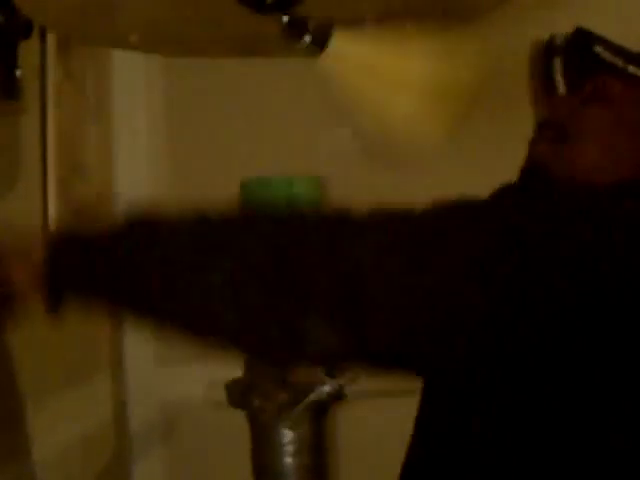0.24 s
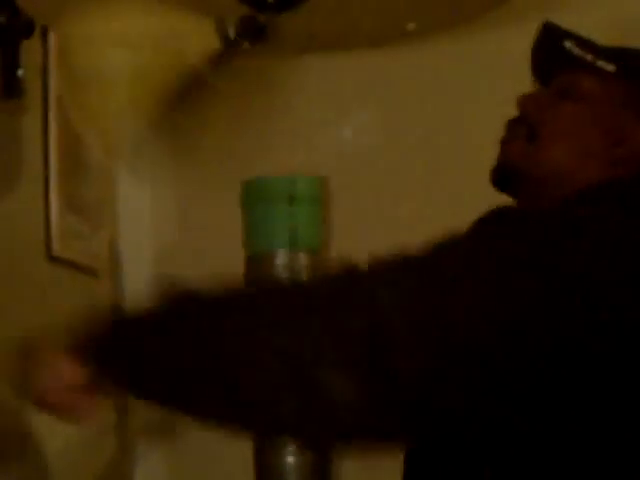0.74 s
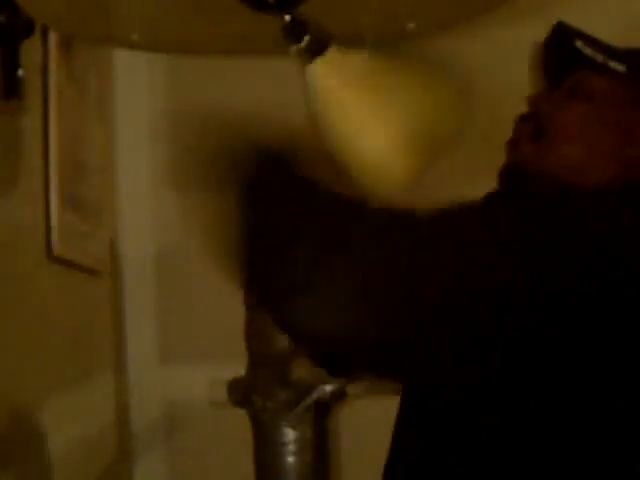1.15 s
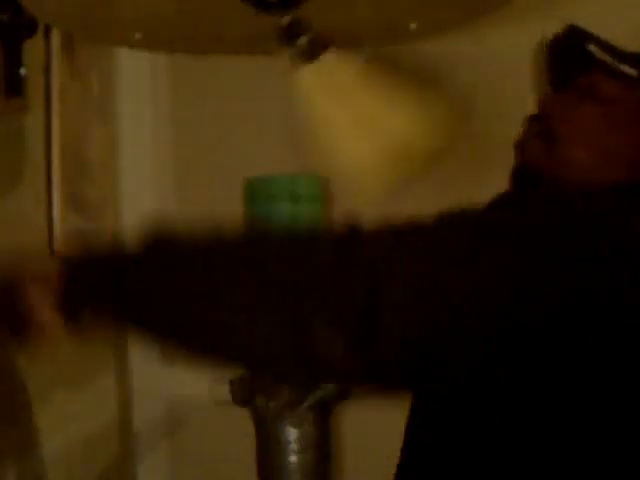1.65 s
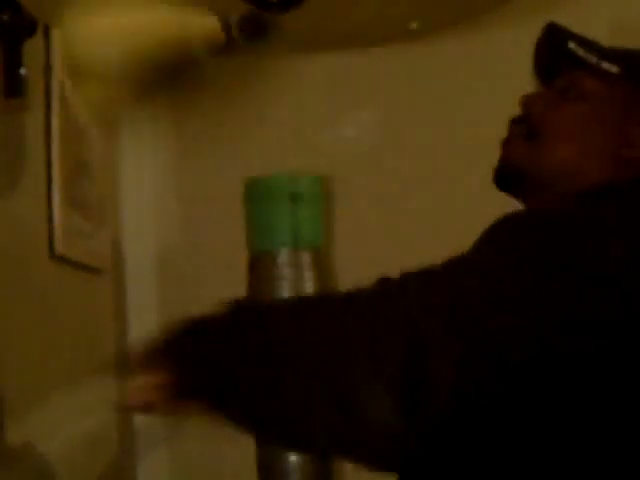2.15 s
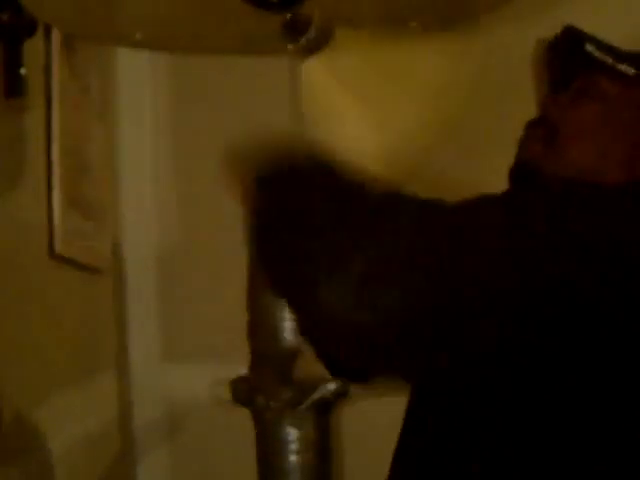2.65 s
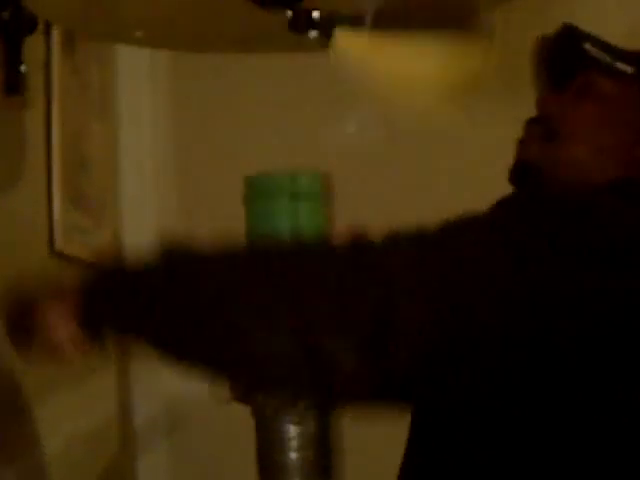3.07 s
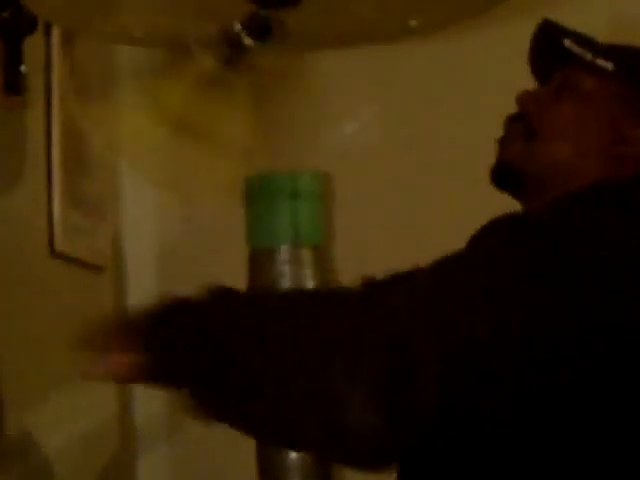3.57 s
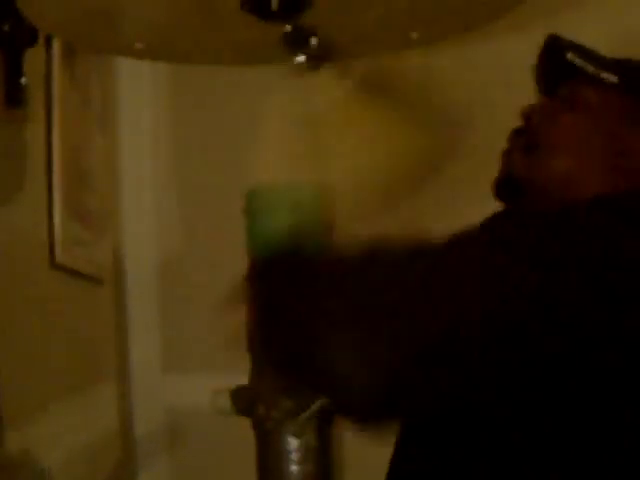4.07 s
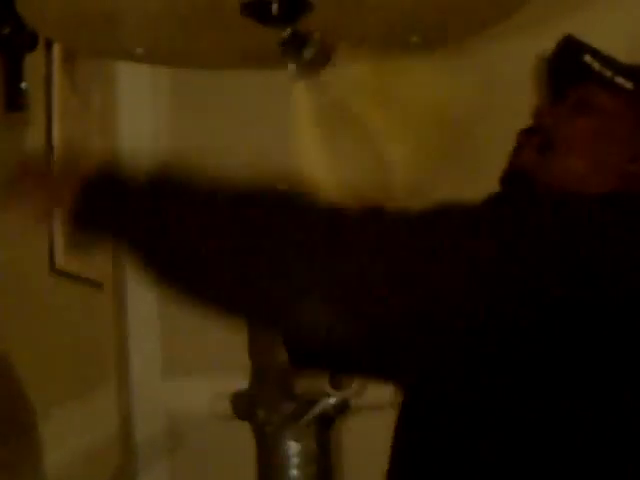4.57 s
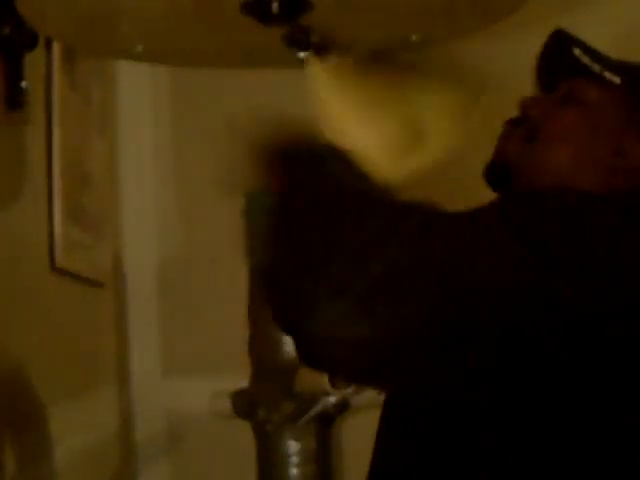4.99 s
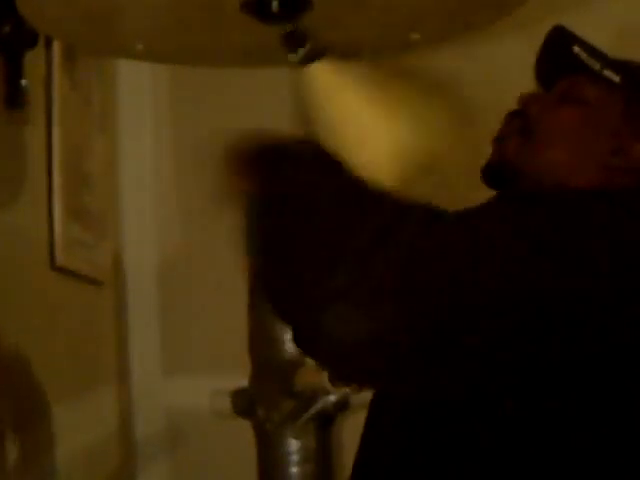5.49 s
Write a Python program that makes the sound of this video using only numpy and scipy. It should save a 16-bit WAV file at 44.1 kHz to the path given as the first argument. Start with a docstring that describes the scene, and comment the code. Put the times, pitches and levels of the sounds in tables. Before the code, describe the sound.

The sound starts mid-action in a small indoor room, with quiet low rumble, faint hiss and a barely audible thin high whine throughout. A speed bag slaps its wooden rebound board about six or seven times a second. From 0 to about 4.9 s the pattern cycles roughly every 0.7 s: two hard slaps close together, then two much weaker rebounds; strong pairs fall near 0.54 and 0.67, 1.25 and 1.38, 1.97 and 2.1, 2.68 and 2.8 s, and so on, with an especially hard hit near 4.18 s. Each slap is a short leather crack with a bright snap and deep board boom, preceded by a hollow swivel pock. Brief shackle rattles come between. Dull low thuds, probably footsteps, land about every 0.4 s. From about 4.95 s the hits even out into a fast roll, continuing to the cut-off near 5.7 s. Short room reverberation follows every blow.

```python
"""In a small room with quiet rumble, hiss and a thin whine, a speed bag is punched under its rebound board.
First comes a steady stroke, over and over: two hard slaps, then two fading rebounds.
On every swing the swivel knocks hollowly in its socket; a moment later leather slaps the booming board.
Jerks rattle the shackle, and dull thuds, likely the boxer's steps, keep their own slower beat.
Near the end the stroke becomes a fast roll. Contacts are shaped noise and pulses; bodies are damped modes."""
import sys
import numpy as np
from scipy import signal
from scipy.fft import rfft, irfft, next_fast_len
from scipy.io import wavfile
from scipy.ndimage import map_coordinates

SR = 44100
rng = np.random.default_rng(int(sys.argv[2]) if len(sys.argv) > 2 else 0)


def unload_audio(sound):
    """Save the sound as a 16-bit wav file, at the path given as the first command line argument."""
    columns = np.transpose(np.atleast_2d(sound))
    # keep every value between -1 and 1, then stretch to whole-number steps
    steps = np.round(np.clip(columns, -1, 1) * 32767)
    wavfile.write(sys.argv[1], SR, steps.astype(np.int16))


N = 253134
LEAD = SR // 4  # samples kept for blows that are already ringing at the start
AGE = np.arange(int(.8 * SR)) / SR  # seconds since a blow


def amp(db):
    """Decibels to gain."""
    return 10 ** (np.asarray(db) / 20)


def along(points, hz):
    """Read (pitch_hz, value) points on a log frequency axis."""
    point_hz, values = np.transpose(points)
    return np.interp(np.log(hz + 1), np.log(point_hz), values)


def norm(x):
    """Scale to unit energy."""
    return x / np.sqrt(np.sum(x ** 2) + 1e-20)


def blank():
    """An empty track with room for the lead."""
    return np.zeros(LEAD + N)


def add(track, start_s, sound):
    """Mix a sound into the track at its start time."""
    first = max(0, LEAD + round(start_s * SR))
    part = track[first:][:len(sound)]
    part += sound[:len(part)]


# steady sound of the room: pitch_hz, level_db (relative)
ROOM_TONE_COLOUR = [(15, 23.5), (40, 3.5), (100, -1), (300, -21.5), (1200, -14.5), (3000, -56), (8000, -48),
                    (11000, -64)]


def room_tone():
    """Steady noise, mostly low rumble with faint hiss, plus a narrow noise band heard as an electrical whine."""
    hz = np.fft.rfftfreq(N, 1 / SR)
    noise = irfft(rfft(rng.standard_normal(N)) * amp(along(ROOM_TONE_COLOUR, hz)), N)
    narrow = np.exp(-((hz - 8750) / 100) ** 2)
    whine = irfft(rfft(rng.standard_normal(N)) * narrow, N)
    return amp(-32.5) * noise / noise.std() + amp(-79) * whine / whine.std()


def click(colour, size=2048):
    """The shortest causal pulse with this colour: minimum phase, by folding the cepstrum."""
    log_gain = np.log(amp(along(colour, np.fft.rfftfreq(size, 1 / SR))))
    cepstrum = irfft(log_gain)
    cepstrum[1:size // 2] *= 2
    cepstrum[size // 2 + 1:] = 0
    return norm(irfft(np.exp(rfft(cepstrum))))


# how long the room holds each pitch: pitch_hz, t60_s
ROOM_DECAY = [(100, 0.094), (500, 1), (1300, 0.69), (3500, 0.49), (10000, 0.51)]


def tail(lumps_db, build_s=0.0072, lumps_per_s=170):
    """Unit-energy reverberation in clumps: the deep bass dies first, and the treble before the middle."""
    hz, t, spectra = signal.stft(rng.standard_normal(len(AGE)), SR, nperseg=256)
    decay = amp(-60 * t / along(ROOM_DECAY, hz)[:, None])
    fading = signal.istft(spectra * decay, SR, nperseg=256)[1][:len(AGE)]
    clumps = map_coordinates(rng.standard_normal(size=1024), [AGE * lumps_per_s], mode="wrap")
    build = 1 - np.exp(-AGE / build_s)
    return norm(fading * amp(lumps_db * clumps) * build)


# reflections off near surfaces: delay_s, gain (before each source's walls_db)
NEAR_SURFACES = [(.0038, 0.95), (.0054, .3), (.0083, 0.31), (.0128, 0.67), (.0170, 0.32), (0.02, 0.31),
                 (0.026, 0.23), (0.037, 0.19), (0.0435, 0.2)]


def in_room(x, colour, walls_db, tail_db, lumps_db=1.5):
    """Direct sound, near reflections, and a diffuse tail in the source's colour."""
    path = np.zeros(len(AGE))
    path[0] = 1
    for delay_s, gain in NEAR_SURFACES:
        path[round(delay_s * SR)] += gain * amp(walls_db)
    near = signal.fftconvolve(x, path)[:len(AGE)]
    diffuse = signal.fftconvolve(click(colour), tail(lumps_db))[:len(AGE)]
    return near + amp(tail_db) * diffuse


def ring(modes, scatter_db, rise_s=.001):
    """Damped modes that swell while the contact lasts, at slightly new strengths each time."""
    waves = np.zeros(len(AGE))
    for pitch_hz, level_db, t60_s in modes:
        struck_db = level_db + scatter_db * rng.standard_normal()
        waves += amp(struck_db - 60 * AGE / t60_s) * np.sin(2 * np.pi * pitch_hz * AGE)
    return -waves * (1 - np.exp(-AGE / rise_s))


def bending_pulse(colour, travel_s, size=2048):
    """A knock that has crossed the board: high bending waves arrive first; travel_s is the delay at 1 kHz."""
    hz = np.fft.rfftfreq(size, 1 / SR)
    phase = 4 * np.pi * travel_s * np.sqrt(1000 * hz)  # delay falls as the root of the pitch
    return norm(irfft(amp(along(colour, hz)) * np.exp(-1j * phase))[:size // 2])


# hollow knock before its small shifts: pitch_hz, level_db (relative)
HOLLOW_COLOUR = [(100, -33.5), (450, -21), (750, -6), (1050, 2), (1320, 6), (1600, -4.5), (1800, -1),
                 (2050, -14), (2500, -30), (3200, -23.5), (4500, -44.5), (11000, -68)]


def hollow_knock(db, walls_db, tail_db, usual_db=-6):
    """A short hollow pock: harder contacts tend to sound higher, and no two land alike."""
    stretch = np.exp(0.0046 * (db - usual_db) + 0.033 * rng.standard_normal())
    colour = [(pitch_hz * stretch, level_db + 2.3 * rng.standard_normal())
              for pitch_hz, level_db in HOLLOW_COLOUR]
    pulse = bending_pulse(colour, travel_s=.0036)
    return amp(db) * in_room(pulse, colour, walls_db, tail_db, lumps_db=4.5)


# faint hollow ring of the swivel mount: pitch_hz, level_db (relative), t60_s
MOUNT_MODES = [(557, -4.5, 1), (678, -2.5, 0.79), (810, -6.5, 1), (862, -0.5, 0.96), (1038, 1.5, 0.89),
               (1046, 1, 1), (1142, 0, 0.98), (1280, -22, 0.68), (1250, -15, 0.32), (1463, 14, 0.094),
               (1725, 16.5, 0.057)]


def swivel():
    """The swivel knocks at each jerk and just before each slap, and leaves a faint ring in its mount."""
    out = blank()
    knocks = [(start_s - early_s, knock_db) for start_s, _, early_s, knock_db in SWINGS]
    knocks += [(start_s, level_db + 3) for start_s, level_db in JERKS]  # dB over the jerk's level
    for start_s, db in knocks:
        add(out, start_s - .002, hollow_knock(db, walls_db=-0.5, tail_db=1.5))
        add(out, start_s, amp(db - 42.5) * ring(MOUNT_MODES, scatter_db=3.5))
    return out


def echoed(x, delay_s, gain):
    """A sound plus one delayed copy."""
    return x + gain * np.interp(AGE - delay_s, AGE, x, left=0)


def crack(colour, t60_s, flap_delay_s, flap_gain):
    """A soft surface lands in a short noisy burst, then flattens with a second one; unit energy."""
    decay = amp(-60 * AGE / t60_s)
    envelope = echoed(decay, flap_delay_s, flap_gain)[:SR // 20]
    burst = envelope * rng.standard_normal(len(envelope))
    return norm(signal.fftconvolve(burst, click(colour)))


# dull thuds underfoot: start_s, level_db
STEPS = [(-0.05, -30.5), (0.2192, -14.5), (0.665, -17), (1.0558, -18), (1.4299, -18), (1.8942, -19),
         (2.216, -18), (2.713, -19), (3.0357, -16.5), (3.5, -19.5), (3.7522, -17), (4.2433, -17.5),
         (4.6686, -17.5), (5.0397, -17), (5.4638, -17)]
# the floor under the feet: pitch_hz, level_db (relative), t60_s
FLOOR_MODES = [(60.6, -11, 0.21), (89, -20, 0.3), (109.6, -22.5, 0.48), (136.9, -13, 0.42),
               (146.15, -14.5, 0.57), (177.5, -23.5, 0.5), (216.7, -36, 0.61), (256.3, -34, 0.36),
               (344.5, -30, 0.47)]
# pat of the soles: pitch_hz, level_db (relative)
SOLE_COLOUR = [(60, -10.5), (200, 8), (400, -4), (650, -5), (1000, -12.5), (2000, -46), (5000, -38),
               (11000, -83)]


def feet():
    """A soft blow rings the floor under a pat of the sole; the far wall returns its bass strongly."""
    out = blank()
    for start_s, level_db in STEPS:
        floor = ring(FLOOR_MODES, scatter_db=4.0, rise_s=0.0019)
        thud = echoed(floor, delay_s=.0276, gain=2.09)
        sole = crack(SOLE_COLOUR, t60_s=0.046, flap_delay_s=0.025, flap_gain=1.07)
        pat = in_room(sole, SOLE_COLOUR, walls_db=-17.0, tail_db=0.0)
        add(out, start_s, amp(level_db) * thud)
        add(out, start_s + 0.002876, amp(level_db + 14) * pat)
    return out


# four slaps of a stroke (first punch, second punch, two free rebounds), over the swing's strength:
# snap_db, wood_db, boom_db
STROKE_MIX = [(-14.5, 1, -11), (-12, -3, -13.5), (-10, -1.5, -15.5), (-11.5, -1.5, -12)]
# the same three columns for the fast roll, where the fists keep driving the bag
ROLL_MIX = (-13.5, 0.38, -10.5)
ROLL_FROM_S = 4.95


def slap_mix(k, start_s):
    """The mix of swing k: round the stroke, starting at its second punch, until the roll takes over."""
    if start_s < ROLL_FROM_S:
        return STROKE_MIX[(k + 1) % len(STROKE_MIX)]
    return ROLL_MIX


# the bag swings up against the board: start_s, strength_db, knock_early_s, knock_db (knocks of the swivel)
SWINGS = [(-0.04, -1.5, 0.016, 1), (0.1637, -11.5, 0.043, -9), (0.401, -12, .0406, -5.5),
          (0.538, -3, .0135, -2.5), (0.671, -4, 0.016, 0), (0.8686, -11, 0.037, -9.5),
          (1.1139, -11.5, 0.041, -6.5), (1.251, -4, .011, -5), (1.3752, -3, 0.0097, -1),
          (1.5875, -12.5, 0.039, -10), (1.8474, -11, 0.042, -8), (1.973, -6, 0.013, -12),
          (2.099, -1, 0.0092, 0.5), (2.2881, -11, 0.037, -10), (2.5238, -10, 0.035, -7),
          (2.675, -1.5, .014, 0.5), (2.7967, 0, .0134, 0.5), (2.9681, -8, 0.036, -15),
          (3.1859, -10.5, .033, -5), (3.3538, -0.5, .019, -2), (3.4711, -1, 0.0098, -3),
          (3.6561, -9, 0.037, -7.5), (3.8867, -13.5, 0.039, -7), (4.0501, -5, .0142, -0.5),
          (4.176, 2.5, .011, -2), (4.3526, -9, 0.027, -16), (4.5677, -18.5, .028, -9),
          (4.7323, -3.5, 0.014, 0.5), (4.8878, -1.5, 0.017, -3), (5.0255, -6, .022, -1.5),
          (5.1524, -6, 0.026, -21), (5.274, -7.5, 0.053, -13), (5.4409, -4, 0.025, -9.5),
          (5.5428, -2.5, 0.02, -24), (5.6916, -4, 0.03, -11.5)]
# the board on its mount: pitch_hz, level_db (relative), t60_s
BOARD_MODES = [(14.1, -22.5, 0.83), (30, -25.5, 0.49), (56.5, -19.5, 0.48), (85.46, -11.5, 0.22),
               (97.4, -12, 0.36), (128.6, -23.5, 0.56), (254.2, -42, 0.52), (338.2, -30.5, 0.75)]
# broad leather smack: pitch_hz, level_db (relative)
SMACK_COLOUR = [(150, 7), (400, -2.5), (900, -2.5), (1900, 3.5), (2550, -7.5), (3400, -1.5), (4400, -14),
                (5600, -12), (7000, -19.5), (11000, -38)]
# bright leather snap: pitch_hz, level_db (relative)
SNAP_COLOUR = [(2000, -44), (4500, -5), (5600, -28), (7000, 2), (9000, 12.5), (11000, 5), (12500, -65)]
BOOM_GROWS = 0.61  # dB of boom per dB of strength


def board():
    """The bag smacks the board: leather crack, wooden knock and slow boom, all growing with strength."""
    out = blank()
    for k, (start_s, strength_db, _, _) in enumerate(SWINGS):
        snap_db, wood_db, boom_db = slap_mix(k, start_s)
        leather = crack(SMACK_COLOUR, t60_s=0.015, flap_delay_s=0.0035, flap_gain=0.31)
        smack = in_room(leather, SMACK_COLOUR, walls_db=-37, tail_db=0)
        bright = crack(SNAP_COLOUR, t60_s=0.005, flap_delay_s=.0027, flap_gain=1.0)
        snap = in_room(bright, SNAP_COLOUR, walls_db=-12.0, tail_db=-6.0)
        boom = echoed(ring(BOARD_MODES, scatter_db=4.5, rise_s=0.0062), delay_s=.034, gain=1.486)
        add(out, start_s, amp(strength_db) * smack + amp(strength_db + snap_db) * snap)
        add(out, start_s - .001, hollow_knock(strength_db + wood_db, walls_db=-15.5, tail_db=-1.5))
        add(out, start_s - .001, amp(BOOM_GROWS * strength_db + boom_db) * boom)
    return out


# the shackle is jerked by a punch, or lightly as the bag turns: start_s, level_db
JERKS = [(0.055, -17.5), (0.493, -17), (0.923, -22), (1.198, -22), (1.335, -10), (1.471, -20.5),
         (2.069, -11.5), (2.6253, -16), (3.294, -15.5), (3.996, -14), (4.126, -11.5), (4.455, -25.5),
         (4.683, -14), (4.95, -13.5), (5.358, -13.5), (5.624, -19)]
# rattle of the shackle: pitch_hz, level_db (relative)
RATTLE_COLOUR = [(100, -11), (300, 8), (600, 8), (1300, -2.5), (2400, -4.5), (3200, 1.5), (4500, -13),
                 (7000, -11.5), (11000, -17)]


def shackle():
    """Every jerk rattles the bag's shackle in a short double burst of noise."""
    out = blank()
    for start_s, level_db in JERKS:
        rattle = crack(RATTLE_COLOUR, t60_s=0.037, flap_delay_s=0.0023, flap_gain=0.28)
        add(out, start_s, amp(level_db) * in_room(rattle, RATTLE_COLOUR, walls_db=-12, tail_db=2.0))
    return out


def scene():
    """Swivel, feet, board and shackle over the quiet of the room."""
    blows = swivel() + feet() + board() + shackle()
    return (blows[LEAD:] + room_tone())[None]


def record(dry):
    """The microphone rolls off the deepest bass and cuts steeply above its band limit."""
    low_hz, top_hz = 11, 11230
    size = next_fast_len(N + SR // 4)
    hz = np.fft.rfftfreq(size, 1 / SR)
    bass_cut = hz ** 2 / np.hypot(hz ** 2, low_hz ** 2)
    treble_cut = 1 / np.sqrt(1 + (hz / top_hz) ** 200)
    return irfft(rfft(dry, size) * bass_cut * treble_cut, size)[:, :N]


dry = scene()
out = record(dry)
unload_audio(out)
```